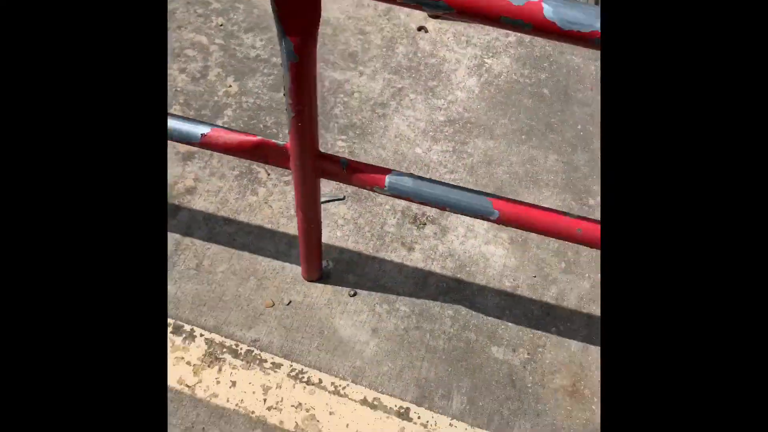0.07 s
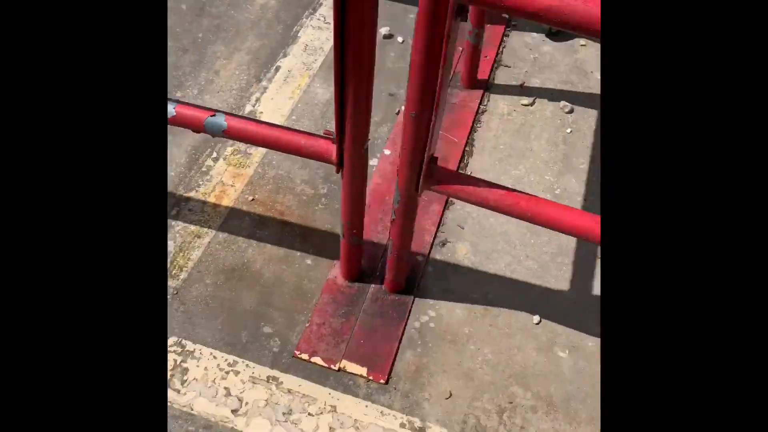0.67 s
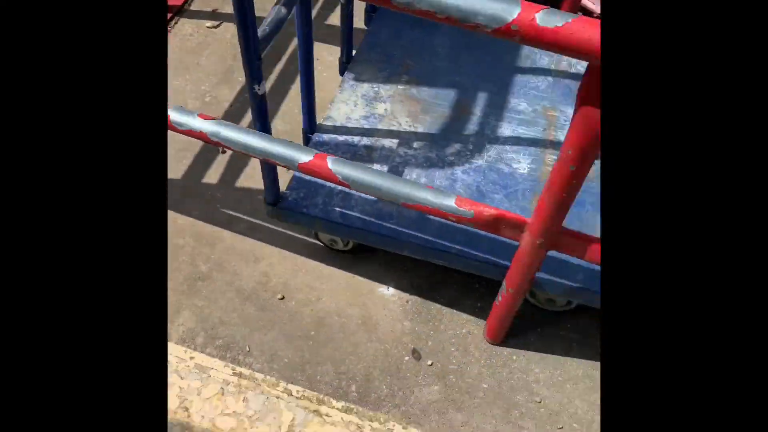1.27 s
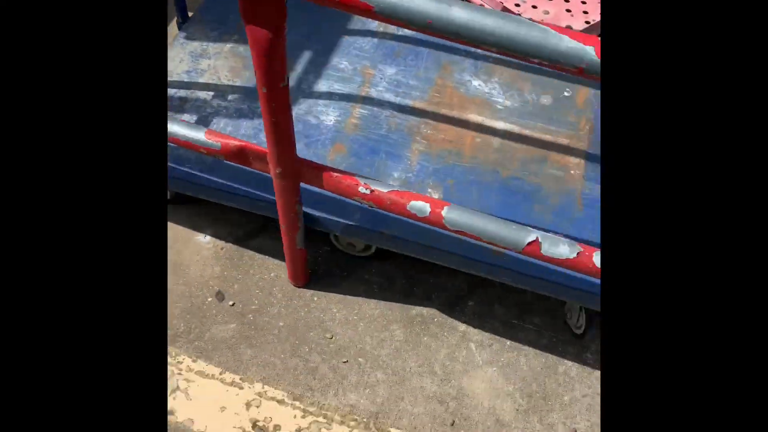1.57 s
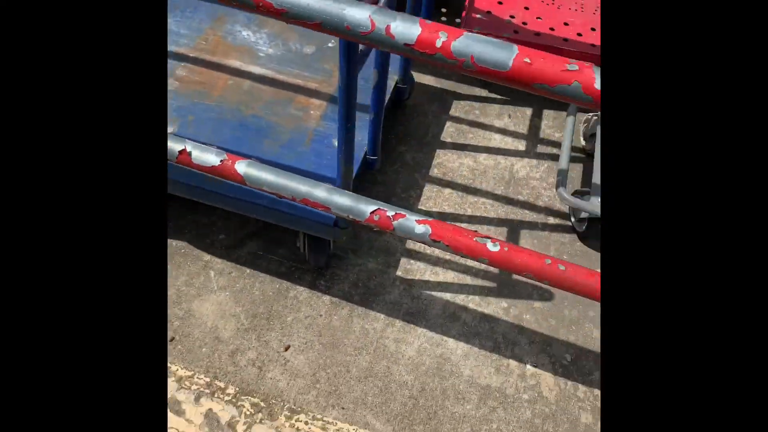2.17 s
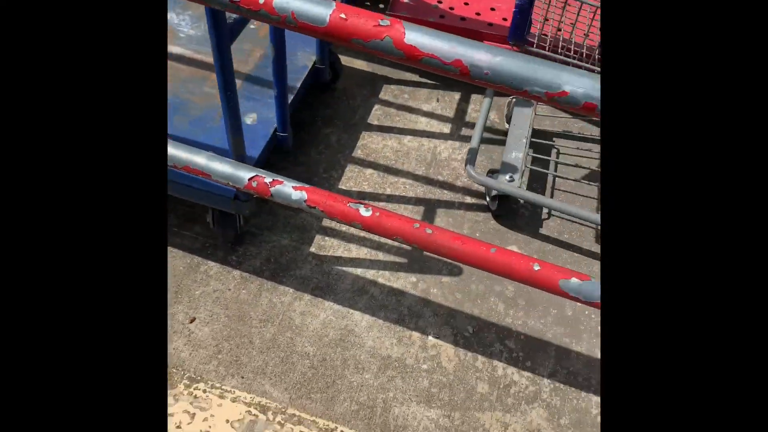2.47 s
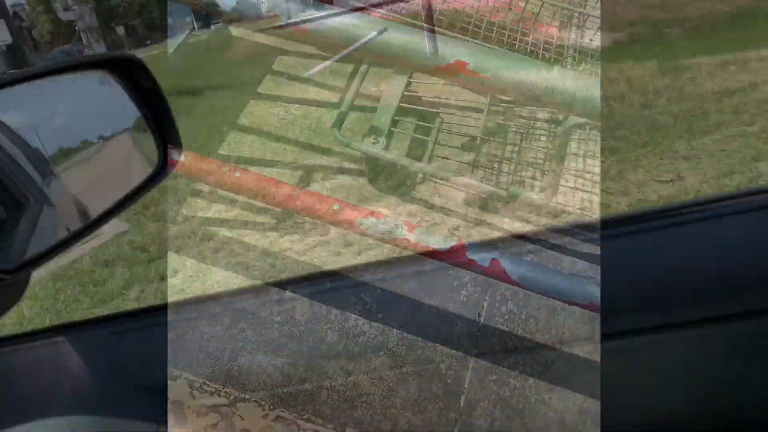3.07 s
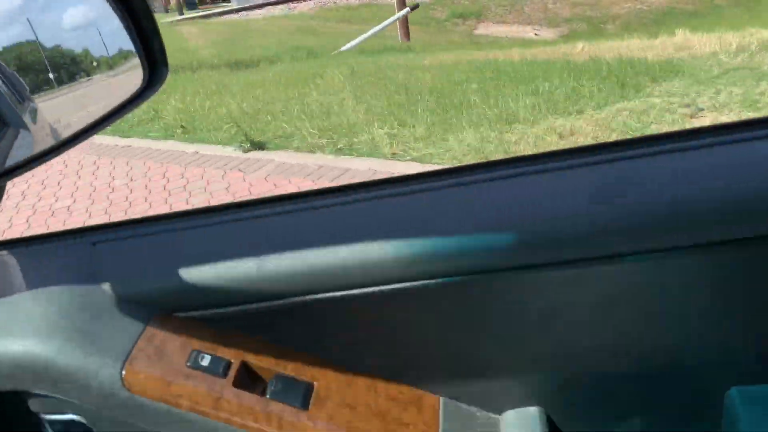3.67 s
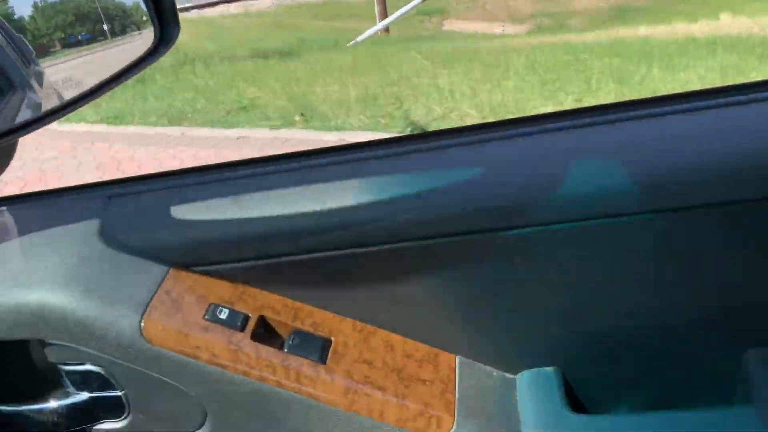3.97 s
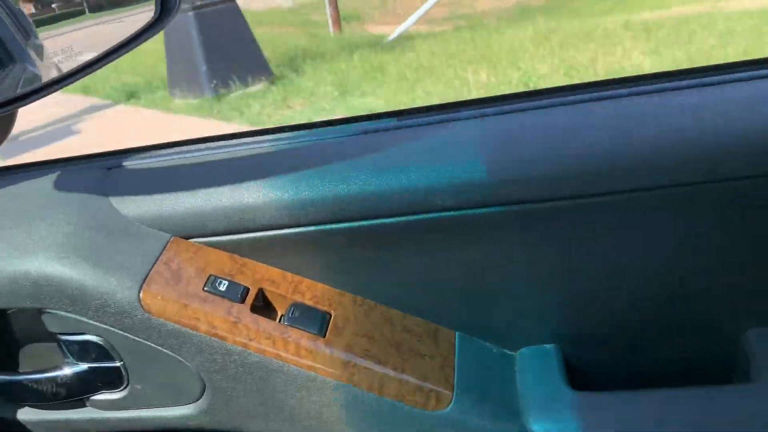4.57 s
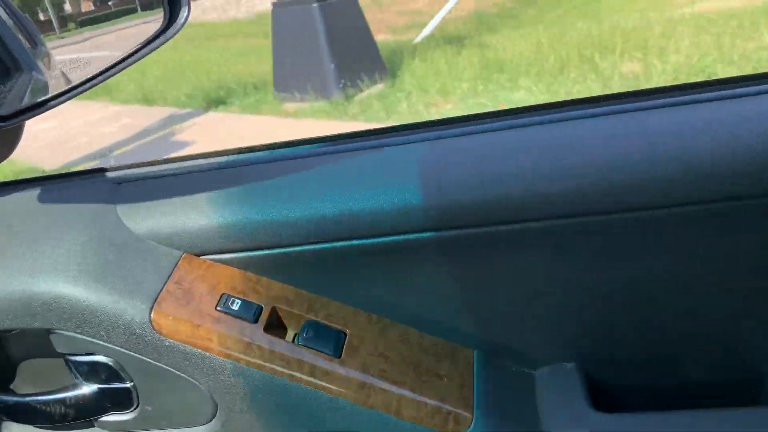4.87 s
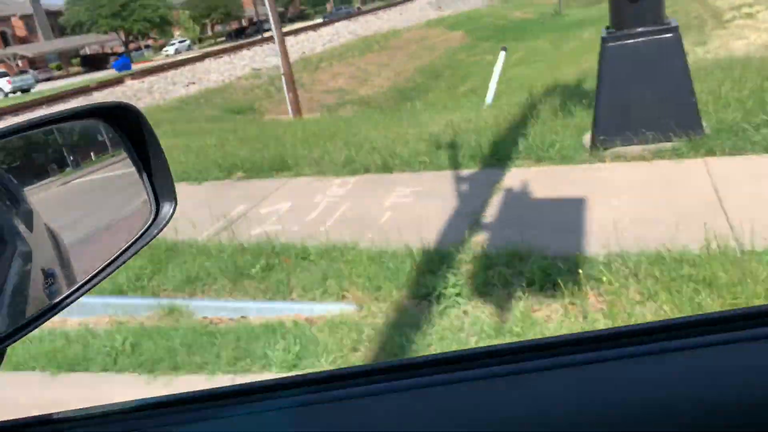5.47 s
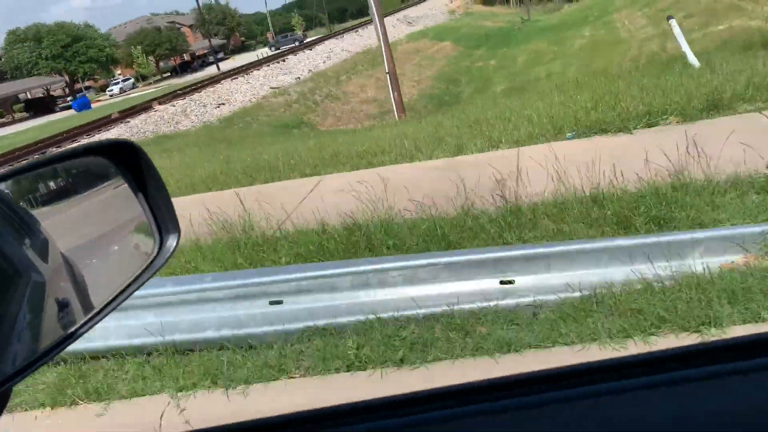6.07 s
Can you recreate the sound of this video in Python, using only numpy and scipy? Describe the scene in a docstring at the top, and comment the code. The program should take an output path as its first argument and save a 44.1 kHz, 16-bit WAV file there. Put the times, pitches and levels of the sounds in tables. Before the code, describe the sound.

Heard from outside, a dry drive shaft joint squeaks under a creeping vehicle, alternating hard and light rubs over a low rumble, with one dull thud. The squeaks slow and drop into rough scrapes. The sound fades into a car cabin with louder road rumble, where an indicator ticks and quick, high chirps grow as the engine winds up and changes gear.

```python
"""Squeaks come first, hard and light in turn: a dry universal joint rubs twice on every turn of a drive shaft.
The microphones are outside a vehicle that creeps ever more slowly, and the stick-slip squeaks drag into
scrapes that shake the body. This fades into the cabin of a car that gathers speed, where quick chirps grow
over road rumble, tyre roar, engine hum and the ticking indicator."""
import sys
import numpy as np
from scipy import signal
from scipy.fft import rfft, irfft, next_fast_len
from scipy.io import wavfile
from scipy.ndimage import uniform_filter1d

SR = 44100
rng = np.random.default_rng(int(sys.argv[2]) if len(sys.argv) > 2 else 0)


def wav_out(sig):
    """Save sig, one row per channel (or a flat mono array), as 16-bit PCM at SR to the path in sys.argv[1]."""
    wavfile.write(sys.argv[1], SR, np.round(np.clip(np.atleast_2d(sig).T, -1, 1) * 32767).astype(np.int16))


N = 279153
TIME = np.arange(N) / SR
CUTOFF_HZ = 15800


def joint(rubs, modes, apex, hold, wander, overtone_db, grit_db, idle_db):
    """Stick-slip in the bearing cup gives a harmonic squeal; rusty needles grind; both ring the shaft."""
    jitter, hop_size, half_partials, flutter, rasp = .065, .024, .65, .7, .45
    level, pitch, tone, rough = rub_motion(rubs, apex, hold)
    pitch = pitch * (1 + jitter * rough * drift(1800) + wander * drift(110) + hop_size * hops(per_s=55))
    phase = 2 * np.pi * np.cumsum(pitch) / SR
    squeal, power = np.zeros(N), 1e-9
    for k in np.arange(1, 9, .5):
        gain = from_db(overtone_db * np.log2(k)) * np.clip((CUTOFF_HZ - k * pitch) / 500, 0, 1)
        if k % 1:   # strong and weak slips alternate, adding partials between the harmonics
            gain = gain * half_partials * rough
        squeal += gain * (1 + flutter * np.tanh(drift(70))) * np.sin(k * phase)
        power = power + gain ** 2 / 2
    # uneven slips shake the squeal's strength and fray its partials
    squeal = squeal * (1 + rasp * drift(500)) / np.hypot(1, rasp)
    grains = rng.standard_normal(N) * from_db(grit_db * drift(900))
    friction = np.sqrt(tone / power) * squeal + np.sqrt(1 - tone) * rms_one(grains)
    rung = friction + sum(from_db(db) * resonate(friction, hz, width) for hz, width, db in modes)
    level = np.maximum(level, from_db(idle_db))   # a faint grind goes on between rubs
    return level * rung / np.sqrt(uniform_filter1d(rung ** 2, size=500) + 1e-9)


def rub_motion(rubs, apex, hold):
    """Pitch follows sliding speed, up steeply and down slowly; the squeal breaks up as pressure falls."""
    level, tone, rough = np.zeros((3, N))
    pitch = np.full(N, rubs[0][2], float)
    for start, length, top_hz, level_db, scrape, bend, press in rubs:
        span = slice(max(0, int(start * SR)), int((start + length) * SR))
        progress = (TIME[span] - start) / length
        steepness = np.where(progress < apex, 1.5, 1)
        level[span] = from_db(level_db) * pressure(progress * length, length, *press)
        pitch[span] = top_hz * np.exp(-bend * steepness * ((progress - apex) * length) ** 2)
        tone[span] = (1 - scrape) * np.exp(-((progress - apex) / hold) ** 4)
        rough[span] = scrape
    return level, pitch, tone, rough


def pressure(age, length, attack_s, release, rest):
    """Contact pressure builds quickly, holds, then lets go over the last part of a rub."""
    arch = np.clip(np.minimum(age / attack_s, (1 - age / length) / release), 0, 1)
    return rest + (1 - rest) * np.sin(np.pi / 2 * arch) ** 1.32


def hops(per_s):
    """The contact loses its grip and catches at another pitch: random held steps of spread 1."""
    held = np.cumsum(rng.random(N) < per_s / SR)
    return rng.uniform(-np.sqrt(3), np.sqrt(3), N)[held]


# rubs under the creeping vehicle, hard and light in turn:
# (start [s], length [s], top pitch [Hz], relative level [dB], scrape share [0-1], pitch bend [1/s^2])
CREEP_RUBS = [(-0.02, 0.16, 2580, -27.5, 0.16, 14.6), (0.16, 0.17, 5700, -34, 0.27, 70),
              (0.339, 0.19, 2570, -30, 0.45, 34), (0.526, 0.19, 4490, -35, .36, 55),
              (0.731, 0.19, 2237, -28.5, 0.42, 60), (0.934, 0.22, 4030, -33.5, 0.44, 80),
              (1.168, 0.22, 1828, -27.5, 0.54, 65), (1.413, 0.24, 3113, -34.5, 0.42, 48),
              (1.707, 0.29, 1330, -28.5, 0.66, 16), (2.032, 0.39, 1960, -36.5, 0.74, 7.7),
              (2.507, 0.5, 901, -29.5, 0.9, 5), (3.172, 0.3, 875, -39.5, 0.65, 2.7)]
# contact pressure of each kind of rub: (attack [s], release [share of rub], gain at the ends [0-1])
HARD_PRESS = (.025, 0.64, 0.05)
LIGHT_PRESS = (0.05, .44, 0.08)
# ringing of the shaft tube and yoke: (frequency [Hz], width [Hz], gain [dB])
CREEP_SHAFT_MODES = [(1330, 70, 3), (1940, 50, 5), (2200, 50, 1), (3100, 70, -4), (3560, 200, 1),
                     (4230, 180, -1), (4800, 200, -3), (5880, 60, 2), (6060, 60, 6), (6240, 50, 1),
                     (6510, 80, 0), (6750, 120, -3), (7810, 110, 1), (8290, 90, 0), (9450, 80, 3)]
# path from the underbody to the microphones outside: (frequency [Hz], gain [dB])
OUTSIDE_PATH = [(400, -18), (1200, -5.5), (2200, -4.5), (3100, -9.5), (4250, -3), (5400, -7.5),
                (6700, -1.5), (9000, -6), (12000, 0.5), (15500, -9.5)]
# the right channel's treble comes slightly late, so the squeaks lean left: (frequency [Hz], lag [ms])
OUTSIDE_LAG = [(1500, 0), (2300, .04), (2900, .14), (4000, .06), (4900, .102), (7300, .137), (9800, .153),
               (15100, .166)]

def outside_squeaks():
    """From outside, in open air: the slowing shaft's rubs grow longer, lower and rougher."""
    rubs = [(*rub, (HARD_PRESS, LIGHT_PRESS)[k % 2]) for k, rub in enumerate(CREEP_RUBS)]
    squeaks = joint(rubs, CREEP_SHAFT_MODES, apex=.36, hold=.38, wander=.015,
                    overtone_db=-1.5, grit_db=3, idle_db=-50)
    return from_db(2) * in_stereo(squeaks, OUTSIDE_PATH, OUTSIDE_LAG,
                                  echo_db=-11, t60=.065, diffuse_db=-3, diffuse_hz=5600)


# how hard the car's joint binds: (time [s], relative chirp level [dB])
BINDING = [(4.07, -60), (4.22, -51.5), (4.45, -45), (4.8, -47), (5.15, -40), (5.45, -36.5), (5.7, -39),
           (6.05, -32), (6.3, -30.5)]
# its squeal as the load grows:
# (from time [s], hard pitch [Hz], light pitch [Hz], hard scrape share [0-1], light scrape share [0-1])
SQUEAL_REGIMES = [(3.9, 8750, 7850, .4, .38), (4.58, 8000, 8750, .48, .3), (5.39, 7500, 7500, .5, .35),
                  (5.52, 5100, 7450, .45, .4), (5.78, 5050, 4700, .46, .45), (5.97, 4850, 4500, .52, .42)]
# contact pressure of a chirp: (attack [s], release [share of rub], gain at the ends [0-1])
CHIRP_PRESS = (0.034, 0.48, 0.38)

def car_rubs():
    """The car's joint rubs on every half turn of the shaft, at a steady rate and then ever faster."""
    first_s, chirps_per_s, speed_up_s, chirps_per_s2 = 4.045, 14.8, 5.2, 1.86
    duty, bend, light_db, scatter_db, pitch_scatter = .96, 85, -.5, 1.2, .024
    half_turns = chirps_per_s * (TIME - first_s) + chirps_per_s2 * np.maximum(TIME - speed_up_s, 0) ** 2 / 2
    edges = np.interp(np.arange(np.ceil(half_turns[-1]) + 1), half_turns, TIME)
    rubs = []
    for k, (start, end) in enumerate(zip(edges, edges[1:])):
        light = k % 2
        regime = [row for since, *row in SQUEAL_REGIMES if since <= start][-1]
        top_hz, scrape = regime[light::2]
        top_hz *= 1 + pitch_scatter * rng.standard_normal()
        level_db = np.interp((start + end) / 2, *np.transpose(BINDING))
        level_db += light * light_db + scatter_db * rng.standard_normal()
        rubs.append((start, duty * (end - start), top_hz, level_db, scrape, bend, CHIRP_PRESS))
    return rubs


# ringing of the car's shaft: (frequency [Hz], width [Hz], gain [dB])
CAR_SHAFT_MODES = [(3050, 220, -4), (4280, 320, -4), (5000, 400, -5), (6060, 180, -3), (7000, 400, -5),
                   (7750, 250, -2), (8550, 320, 0), (9500, 350, -1), (13600, 1500, -9)]
# path through the body to the microphones in the cabin: (frequency [Hz], gain [dB])
CABIN_PATH = [(1500, 0), (2700, -5), (3600, -3.5), (4600, -8), (6000, -6), (7700, -7), (9600, -5.5),
              (11500, 2), (14000, -0.5), (15500, 2)]
# the right channel comes slightly before the left, so the chirps lean right: (frequency [Hz], lag [ms])
CABIN_LAG = [(3500, -.25), (8000, -.298)]

def cabin_chirps():
    """From inside the car: quick chirps come through the body and echo off the panels close by."""
    chirps = joint(car_rubs(), CAR_SHAFT_MODES, apex=.35, hold=.58, wander=.014,
                   overtone_db=-1, grit_db=2, idle_db=-83)
    return from_db(.5) * in_stereo(chirps, CABIN_PATH, CABIN_LAG,
                                   echo_db=-8, t60=.05, diffuse_db=3, diffuse_hz=6560)


def in_stereo(x, path, lags, echo_db, t60, diffuse_db, diffuse_hz):
    """The treble comes slightly earlier in one channel; lower down, echoes come from all round."""
    x = colour(x, path)
    front = (x + from_db(echo_db) * reflections(x, t60)) / np.hypot(1, from_db(echo_db))
    around = lowpass(np.array([reflections(x, t60), reflections(x, t60)]), diffuse_hz)
    return np.array([front, delayed(front, lags)]) + from_db(diffuse_db) * around


# shaking of the body, heard from outside: (frequency [Hz], relative density [dB])
SHUDDER_COLOUR = [(10, -40), (25, -19), (55, 3.5), (90, 0), (150, -3.5), (240, -9.5), (400, -22.5),
                  (700, -49), (1500, -100)]

def shudder():
    """Each rub shakes the creeping vehicle with a swell of rumble, strong only when the rub is slow."""
    slow_rub_s, delay_s, width_s = .2, .1, .15
    swells = np.zeros(N)
    for start, length, *_ in CREEP_RUBS:
        strength = (1 - np.exp(-(length / slow_rub_s) ** 2)) ** 2.83
        swells += strength * np.exp(-((TIME - start - delay_s) / width_s) ** 2)
    return from_db(-25.5) * swells * rms_one(colour(rng.standard_normal(N), SHUDDER_COLOUR))


# jolts of the body: (time [s], level [dB], low-pass cutoff [Hz], t60 [s])
JOLTS = [(0.92, -9, 273, 0.073), (3.342, -28.5, 713, 0.1)]

def jolts():
    """The body jolts: dull thuds that die quickly, centred between the microphones."""
    out, attack_s = np.zeros(N), .0096
    for start, level_db, hz, t60 in JOLTS:
        age = np.maximum(TIME - start, 0)
        thud = rms_one(lowpass(lowpass(rng.standard_normal(N), hz), hz))
        out += thud * np.minimum(age / attack_s, 1) * from_db(level_db - 60 * age / t60)
    return out


# ringing of the flasher in the cabin: (frequency [Hz], relative level [dB], t60 [s])
FLASHER_MODES = [(2400, -7, 0.036), (2810, -14, 0.046), (5100, -17.5, .03), (6080, -18, 0.04)]

def indicator():
    """Even ticks, each a little louder, ring the flasher and scatter off the dashboard close by."""
    first_s, period_s, first_db, rise_db_per_s = 3.511, .3522, -37.5, 3
    times = np.arange(first_s, TIME[-1], period_s)
    clicks = np.zeros(N)
    clicks[(times * SR).astype(int)] = from_db(first_db + rise_db_per_s * (times - first_s))
    t = np.arange(SR // 8) / SR
    ring = sum(from_db(db - 60 * t / t60) * np.sin(2 * np.pi * hz * t) for hz, db, t60 in FLASHER_MODES)
    ticks = signal.oaconvolve(clicks, ring)[:N]
    dashboard = np.array([reflections(ticks, t60=.094) for _ in range(2)])
    return ticks + from_db(-7) * dashboard


# the engine idles, winds up, then changes gear: (time [s], firing rate [Hz])
FIRING_RATE = [(4.3, 63), (5.85, 176), (6.0, 143.5), (6.2, 142.5), (6.33, 137)]
# its harmonics: (multiple of the firing rate, relative level [dB])
ENGINE_ORDERS = [(1, -2), (2, -16)]
# its fourth harmonic: (time [s], level [dB])
DRONE_LEVEL = [(5.9, -70), (6.0, -48), (6.16, -39.5), (6.33, -44)]

def engine():
    """From the cabin, a low hum on the firing rate; the fourth harmonic drones after the gear change."""
    hum_db, unsteady_db = -33, .5
    firing_hz = in_time(FIRING_RATE) * (1 + .0026 * drift(14))
    phase = 2 * np.pi * np.cumsum(firing_hz) / SR
    hum = sum(from_db(hum_db + db + unsteady_db * drift(1.9)) * np.sin(k * phase)
              for k, db in ENGINE_ORDERS)
    drone = from_db(in_time(DRONE_LEVEL)) * np.sin(4 * phase)
    return np.sqrt(2) * (hum + drone)


# rolling rumble outside, easing as the vehicle slows: (time [s], level [dB])
CREEP_LEVEL = [(0, -27.5), (1.0, -25.5), (1.12, -34), (2.8, -30.5)]
# colours of that rumble and of the tyres: (frequency [Hz], relative density [dB])
CREEP_RUMBLE = [(13, -38), (22, -6), (48, -4), (80, 4), (146, -7), (193, -9.5), (222, -8), (274, -14),
                (385, -24), (500, -25), (650, -61), (1100, -120)]
CREEP_TYRES = [(250, 2), (500, 2), (900, 2.5), (1500, -1.5), (2200, -9.5), (3200, -17.5), (6000, -17),
               (12000, -31), (16000, -60)]
# likeness of the noise at the two microphones outside: (frequency [Hz], correlation [-1 to 1])
CREEP_LIKENESS = [(40, 1), (100, 0.6), (200, 0), (800, 0.12), (1300, 0.85), (2000, 0.6), (2800, 0)]

def outside_road():
    """Behind the squeaks, engine and body rumble while the tyres roll on concrete."""
    rumble = from_db(in_time(CREEP_LEVEL)) * road_noise(CREEP_RUMBLE, CREEP_LIKENESS, flicker_db=.33)
    tyres = from_db(-37.5) * road_noise(CREEP_TYRES, CREEP_LIKENESS, flicker_db=2)
    return rumble + tyres


# rumble and tread roar in the cabin: (time [s], level [dB])
CABIN_LEVEL = [(3.3, -20), (4.2, -22.5), (4.75, -19.5), (5.2, -22), (5.8, -23.5), (6.1, -20.5)]
TREAD_LEVEL = [(5.0, -69), (5.4, -42.5), (5.95, -42.5), (6.17, -36), (6.33, -38)]
# colours of rumble, tyres and tread: (frequency [Hz], relative density [dB])
CABIN_RUMBLE = [(13, -37), (22, -27), (38, 1.5), (60, 3), (156, -13), (209, -20), (236, -32), (283, -24.5),
                (320, -21.5), (420, -29.5), (700, -120)]
CABIN_TYRES = [(180, 11), (290, -0.5), (450, -4.5), (750, -8), (1300, -10.5), (2200, -17.5), (3500, -23.5),
               (6000, -30.5), (9500, -35), (15000, -70)]
TREAD_COLOUR = [(190, -11), (280, 0.5), (350, 21), (460, 3.5), (600, -16), (800, -17)]
# likeness of the noise at the two microphones inside: (frequency [Hz], correlation [-1 to 1])
CABIN_LIKENESS = [(40, 0.95), (130, 0.97), (250, 0.72), (600, 0.62), (1400, 0.27), (3500, 0.07)]
# the open window is on the left, so road noise reaches the right later: (frequency [Hz], lag [ms])
WINDOW_LAG = [(300, 0.21), (1500, .15)]

def cabin_road():
    """Rumble fills the cabin; tyre noise and the tread's hollow roar swell as the car pulls away."""
    pull_away_s, rise_db_per_s = 4.68, 5.5
    tyres_db = -39.5 + rise_db_per_s * np.maximum(TIME - pull_away_s, 0)
    rumble = from_db(in_time(CABIN_LEVEL)) * road_noise(CABIN_RUMBLE, CABIN_LIKENESS, flicker_db=.9)
    tyres = from_db(tyres_db) * road_noise(CABIN_TYRES, CABIN_LIKENESS, flicker_db=2)
    tread = from_db(in_time(TREAD_LEVEL)) * road_noise(TREAD_COLOUR, CABIN_LIKENESS, flicker_db=2)
    left, right = rumble + tyres
    return np.array([left, delayed(right, WINDOW_LAG)]) + tread


def road_noise(spectrum, likeness, flicker_db):
    """Half-octave bands of stereo noise, each with its own flicker and likeness; rms 1."""
    out, edges = 0, 22 * 2 ** np.arange(0, 9.6, .5)
    white = rng.standard_normal((2, 2, N))
    for k, (low, high) in enumerate(zip(edges, edges[1:])):
        hz = np.sqrt(low * high)
        if spectrum[0][0] < high and low < spectrum[-1][0]:
            band = signal.butter(2, [low, high], "band", fs=SR, output="sos")
            mid, side = signal.sosfilt(band, white[k % 2])
            alike = at_hz(likeness, hz)
            gain = from_db(at_hz(spectrum, hz) + flicker_db * drift(14))
            out = out + gain * (np.sqrt(1 + alike) * mid + np.sqrt(1 - alike) * side * [[1], [-1]])
    return rms_one(out)


def reflections(x, t60):
    """Dense short echoes between road, underbody and panels, with the power kept."""
    t = np.arange(SR // 4) / SR
    tail = rng.standard_normal(len(t)) * from_db(-60 * t / t60)
    return signal.oaconvolve(x, tail / np.linalg.norm(tail))[:N]


FFT_SIZE = next_fast_len(N + 4096)
FFT_HZ = np.maximum(np.fft.rfftfreq(FFT_SIZE, 1 / SR), 1)

def colour(x, spectrum):
    """Filter by a smooth spectrum."""
    return irfft(rfft(x, FFT_SIZE) * from_db(at_hz(spectrum, FFT_HZ)), FFT_SIZE)[:N]


def delayed(x, lags):
    """Shift a sound in time by a lag that differs with frequency."""
    lag_s = at_hz(lags, FFT_HZ) / 1000
    return irfft(rfft(x, FFT_SIZE) * np.exp(-2j * np.pi * FFT_HZ * lag_s), FFT_SIZE)[:N]


def resonate(x, hz, width):
    """A resonance of gain 1 at its peak."""
    r = np.exp(-np.pi * width / SR)
    feedback = [1, -2 * r * np.cos(2 * np.pi * hz / SR), r * r]
    return signal.lfilter(np.array([1, 0, -1]) * (1 - r * r) / 2, feedback, x + 1e-18)


def lowpass(x, hz):
    """Second-order low-pass."""
    return signal.sosfilt(signal.butter(2, hz, fs=SR, output="sos"), x)


def drift(rate):
    """Smooth chance of spread 1 that changes about rate times a second."""
    knots = rng.standard_normal(N // 8)
    return rms_one(np.interp(TIME * rate, np.arange(len(knots)), knots))


def in_time(points):
    """A curve at every sample, corners rounded."""
    return uniform_filter1d(np.interp(TIME, *np.transpose(points)), size=600)


def at_hz(points, hz):
    """Read a spectrum on a log-frequency axis."""
    knots_hz, values = np.transpose(points)
    return np.interp(np.log(hz), np.log(knots_hz), values)


def from_db(db):
    """Decibels to gain."""
    return 10 ** (np.asarray(db) / 20)


def rms_one(x):
    """Scale to unit power."""
    return x / np.sqrt(np.mean(x ** 2) + 1e-20)


def scene():
    """The place outside the creeping vehicle fades into the car's cabin, a little louder on the right."""
    fade_start_s, fade_end_s = 2.44, 3.6
    outside = outside_squeaks() + outside_road() + shudder()
    cabin = (cabin_chirps() + cabin_road() + engine() + indicator()) * from_db([[-1], [1]])
    fade = np.clip((TIME - fade_start_s) / (fade_end_s - fade_start_s), 0, 1)
    return (1 - fade) * outside + fade * cabin + jolts()


def record(dry):
    """The top treble of both channels is cut steeply."""
    return signal.sosfilt(signal.ellip(10, .2, 80, CUTOFF_HZ, fs=SR, output="sos"), dry)


dry = scene()
out = record(dry)
wav_out(out)
```